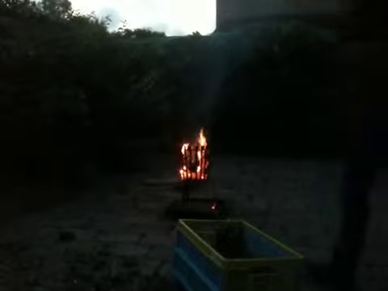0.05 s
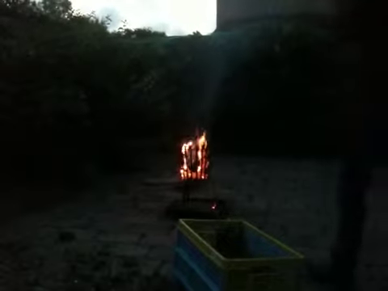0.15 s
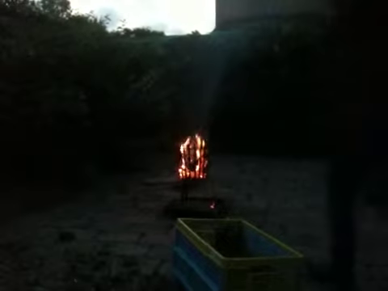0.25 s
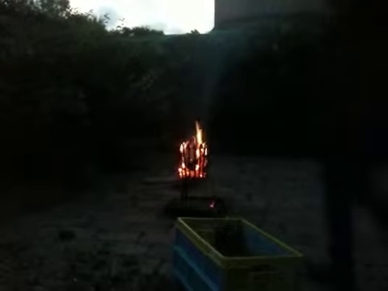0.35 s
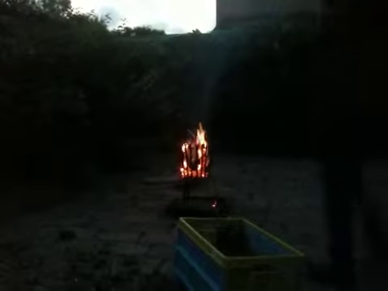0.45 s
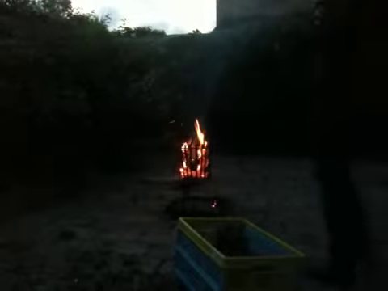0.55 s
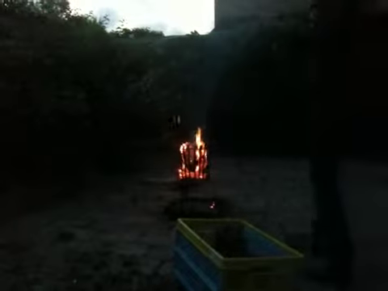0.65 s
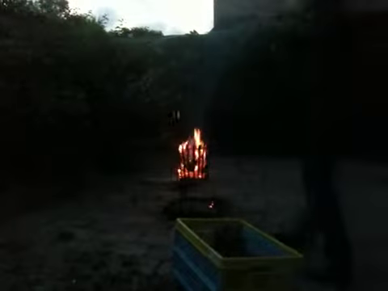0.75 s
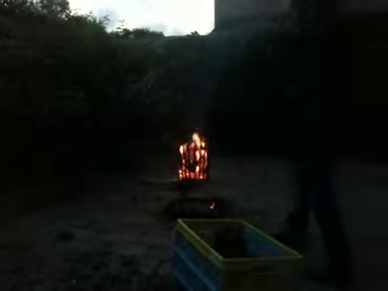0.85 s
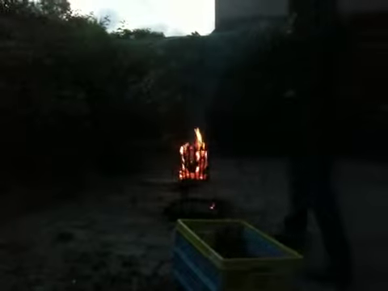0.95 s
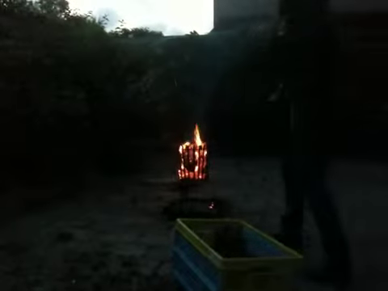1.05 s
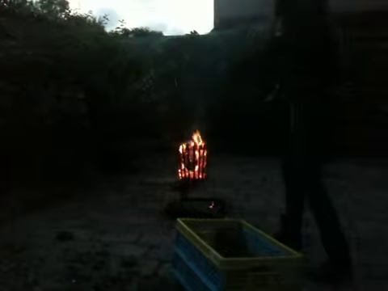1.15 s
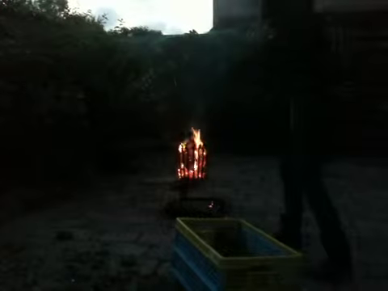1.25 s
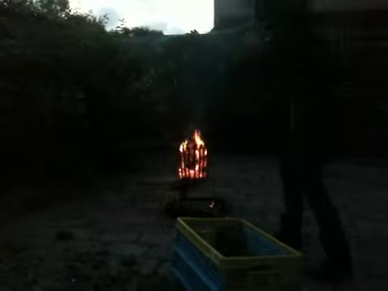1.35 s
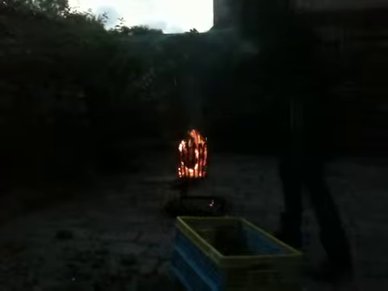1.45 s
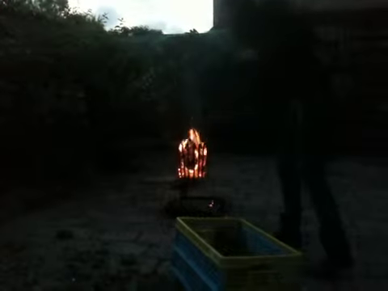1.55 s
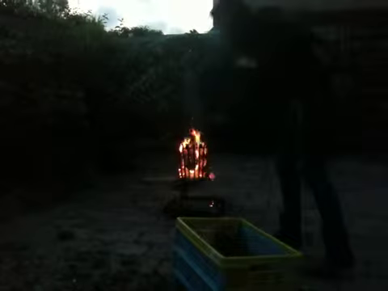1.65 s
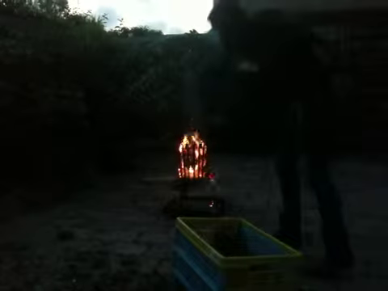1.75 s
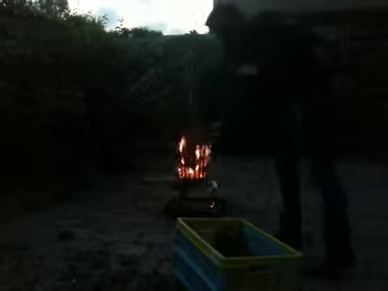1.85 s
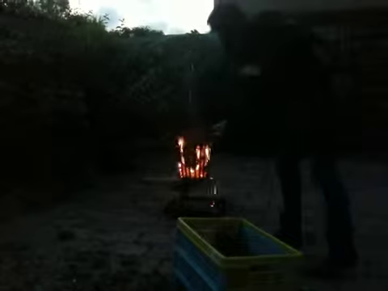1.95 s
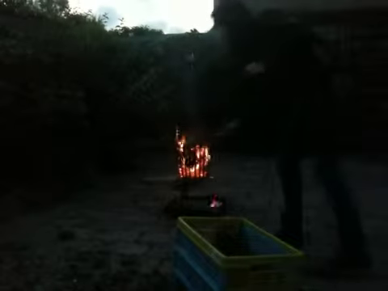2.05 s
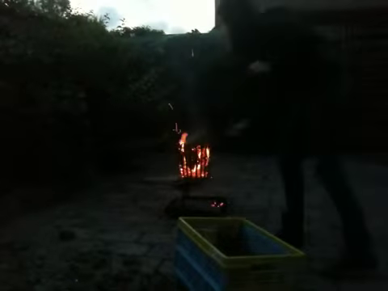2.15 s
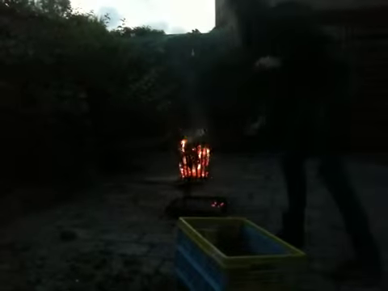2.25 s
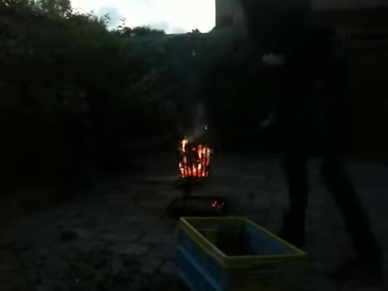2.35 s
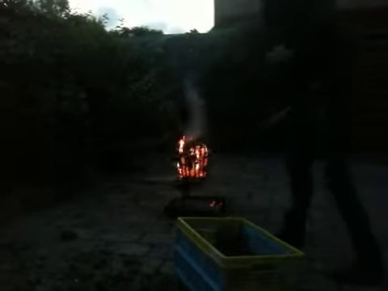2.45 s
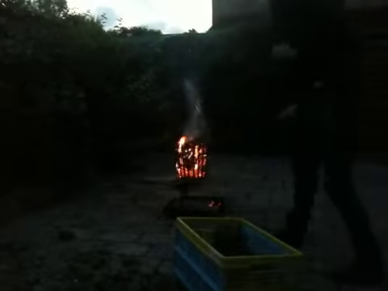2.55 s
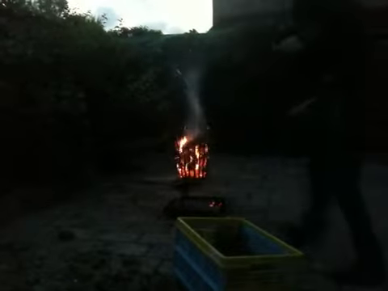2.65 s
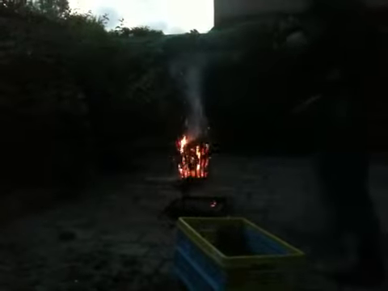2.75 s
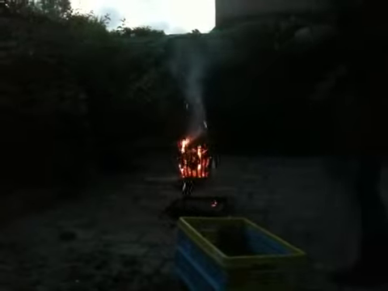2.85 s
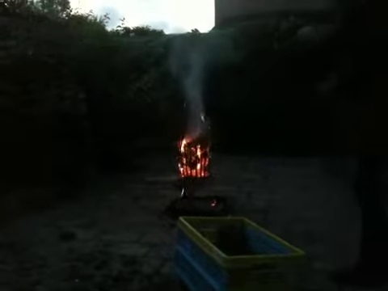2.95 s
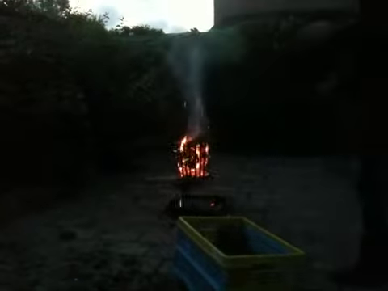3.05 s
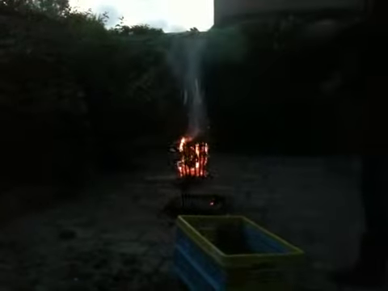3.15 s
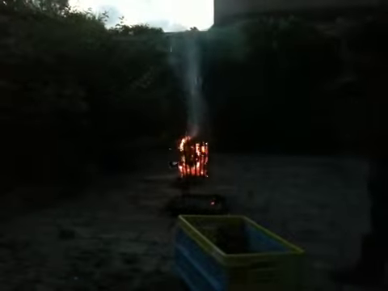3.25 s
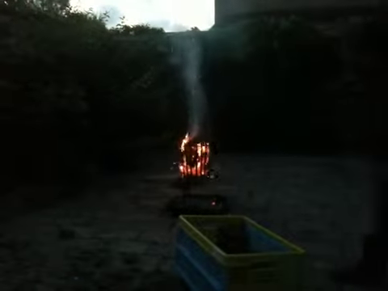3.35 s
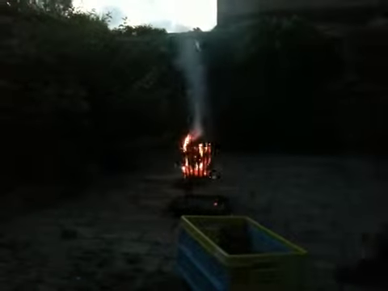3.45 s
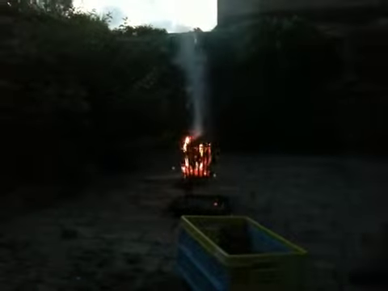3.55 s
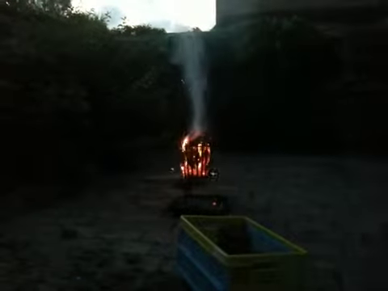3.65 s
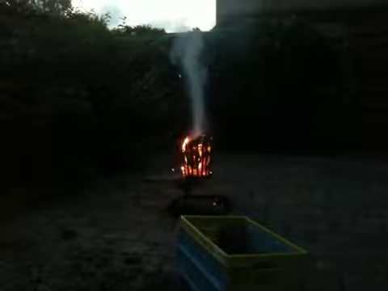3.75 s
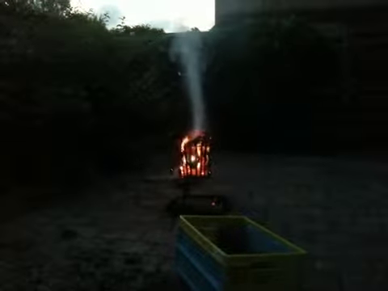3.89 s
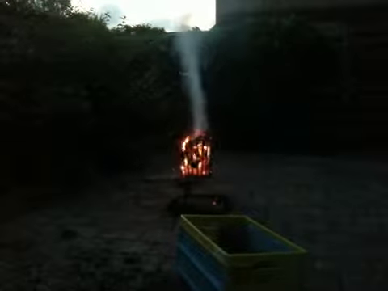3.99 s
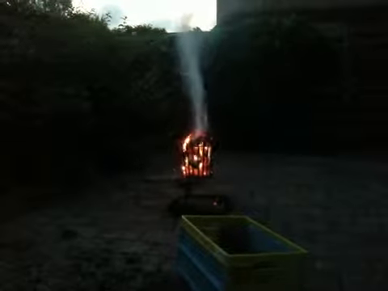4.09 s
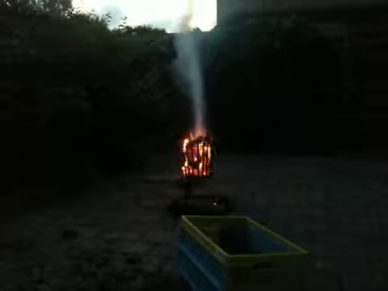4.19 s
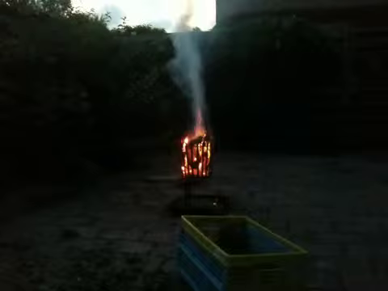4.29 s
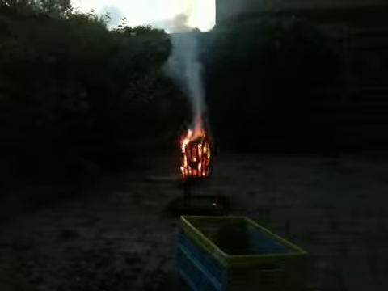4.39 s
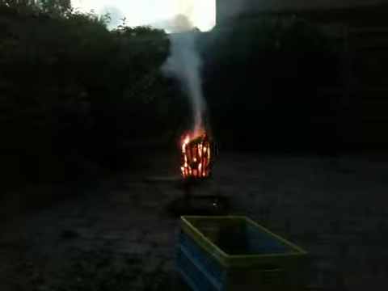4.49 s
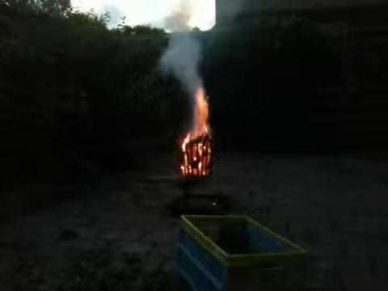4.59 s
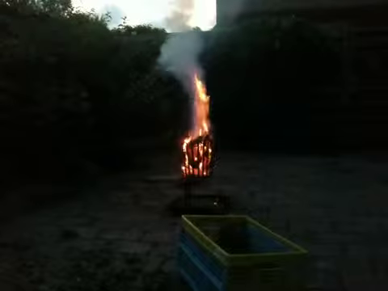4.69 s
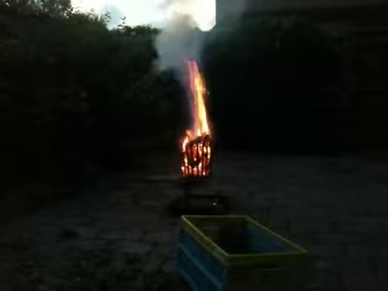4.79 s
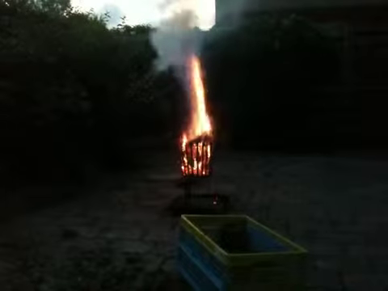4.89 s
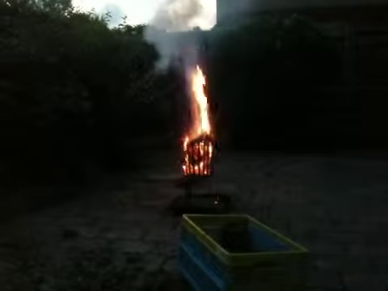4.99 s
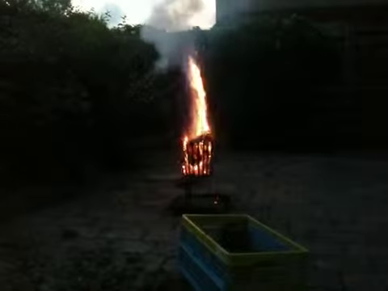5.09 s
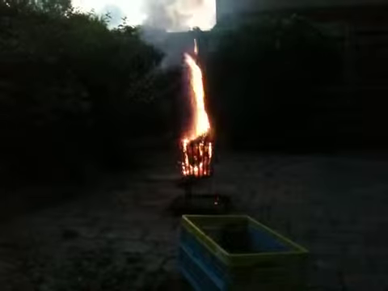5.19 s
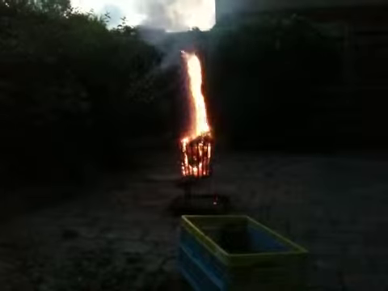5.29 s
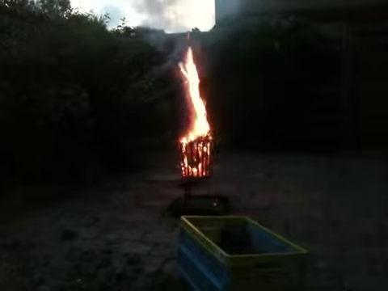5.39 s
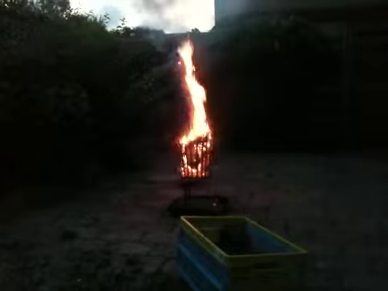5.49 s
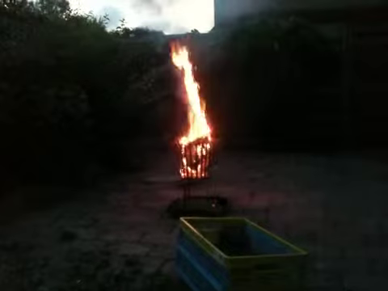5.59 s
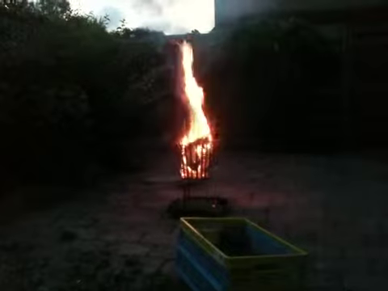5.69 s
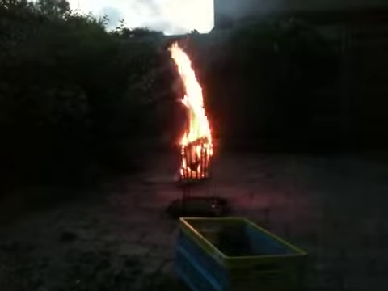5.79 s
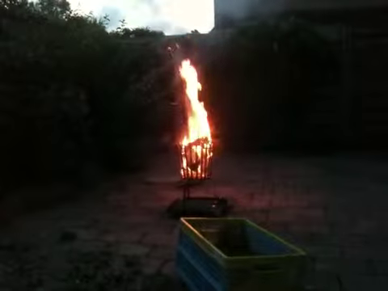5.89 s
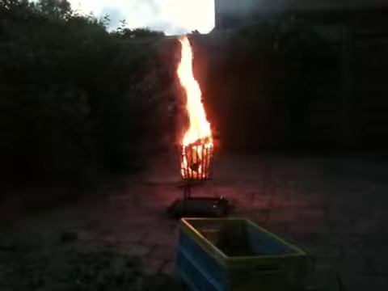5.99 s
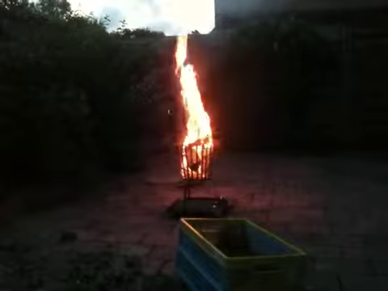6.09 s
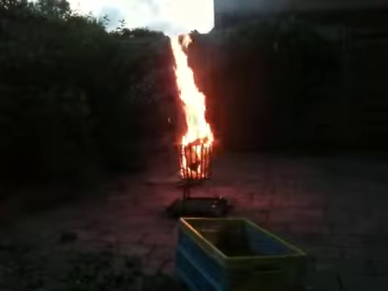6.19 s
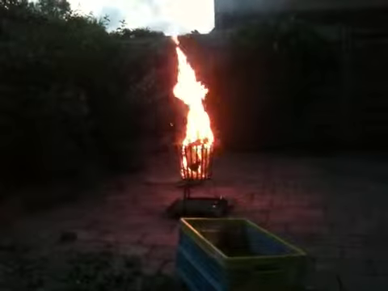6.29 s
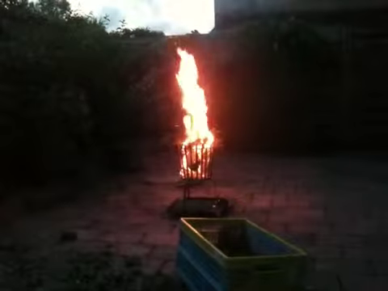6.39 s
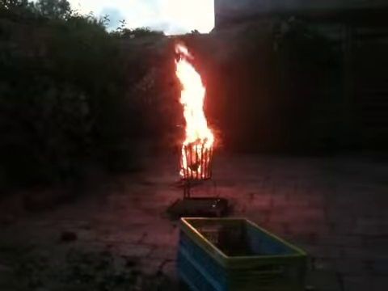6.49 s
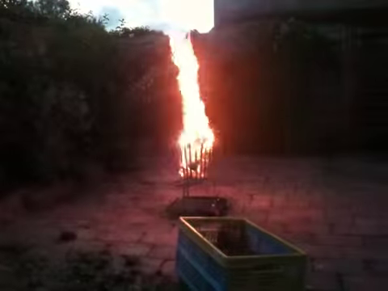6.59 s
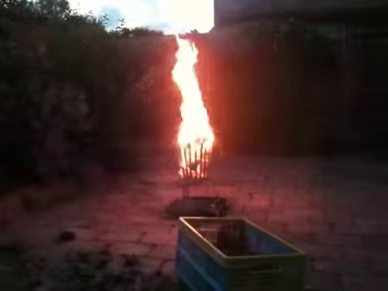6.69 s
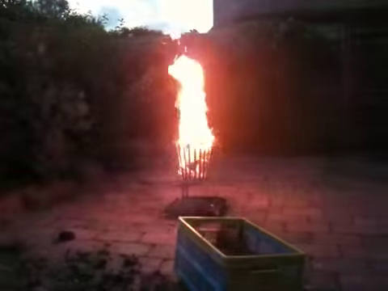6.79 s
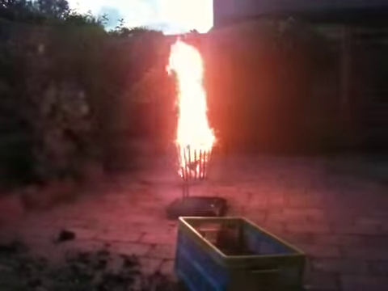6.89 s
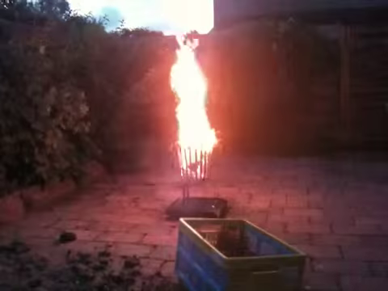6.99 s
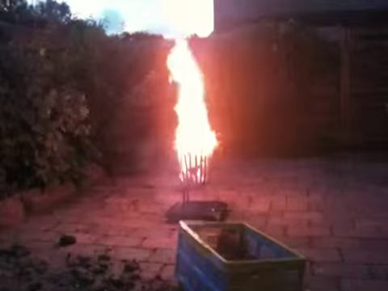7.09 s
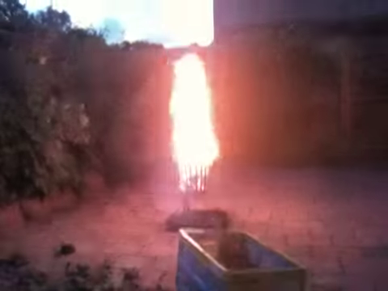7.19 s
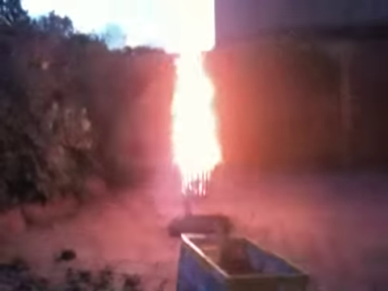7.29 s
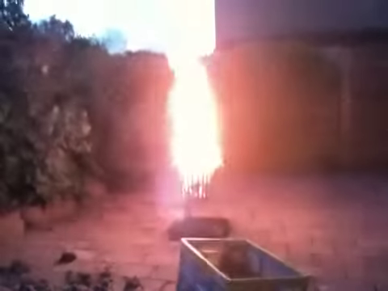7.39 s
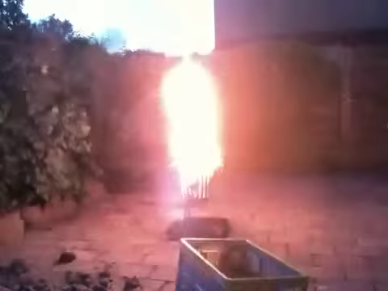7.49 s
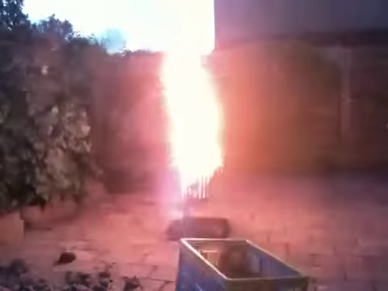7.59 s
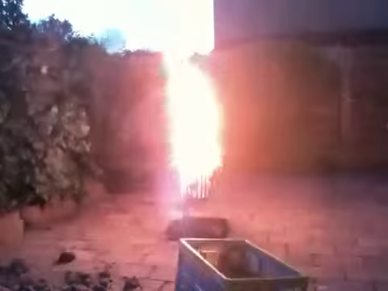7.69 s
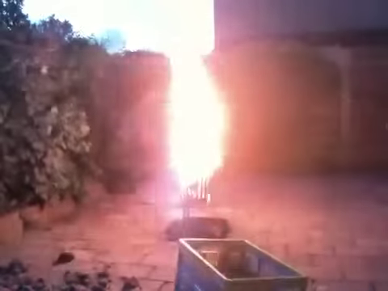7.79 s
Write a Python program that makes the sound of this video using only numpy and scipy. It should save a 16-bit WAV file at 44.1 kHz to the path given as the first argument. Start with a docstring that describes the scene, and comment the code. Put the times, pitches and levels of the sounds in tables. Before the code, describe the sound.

Twigs tick, cloth swishes and thin metal clangs in a quiet yard, then a dry shrub catches and builds into a dense, hissing crackle.

```python
"""A dry heather shrub burns on a fire basket in a paved yard: countless stem bursts thicken into a hissing crackle.
Before it flares, twigs tick and cloth swishes as it is carried over; feet knock and thin metal clangs.
Crackle and twigs are random clicks and bursts with short echoes; knocks and clang are dying tones with noise.
Far off, a vehicle's wavering firing tone climbs, drops at a gear change and climbs again.
One small outdoor microphone hears it all, weak in the deep bass and cut steeply at the top."""
import sys
import numpy as np
from scipy import signal
from scipy.fft import rfft, irfft
from scipy.io import wavfile

SR = 44100
rng = np.random.default_rng(int(sys.argv[2]) if len(sys.argv) > 2 else 0)


def wav_out(sig):
    """Save sig, one row per channel (or a flat mono array), as 16-bit PCM at SR to the path in sys.argv[1]."""
    wavfile.write(sys.argv[1], SR, np.round(np.clip(np.atleast_2d(sig).T, -1, 1) * 32767).astype(np.int16))


N = 345744


def from_db(db):
    """Decibels to gain."""
    return 10 ** (np.asarray(db) / 20)


def rms_one(x):
    """Scale to unit rms."""
    return x / np.sqrt(np.mean(x ** 2) + 1e-20)


def in_time(rows):
    """Interpolate each column after the time column to one value per sample."""
    s, *columns = np.transpose(rows)
    return [np.interp(np.arange(N) / SR, s, c) for c in columns]


def drift(rate_hz):
    """Slow random wander of unit rms: noise through two equal low-pass poles, made at every 40th sample."""
    r = np.exp(-2 * np.pi * rate_hz * 40 / SR)
    raw = rng.standard_normal(N // 40 + 2002)
    slow = signal.lfilter([1], [1, -2 * r, r * r], raw)[2000:]   # drop the filter's start-up
    return np.interp(np.arange(N) / 40, np.arange(len(slow)), rms_one(slow))


def response(spectrum, bumps=(), size=4096):
    """Minimum-phase impulse response of unit energy with a given colour and extra resonances."""
    hz = np.maximum(np.fft.rfftfreq(size, 1 / SR), 1)
    points_hz, points_db = np.transpose(spectrum)
    db = np.interp(np.log(hz), np.log(points_hz), points_db)
    for centre, width, height in bumps:
        db = db + height / (1 + (2 * (hz - centre) / width) ** 2)
    # folding the cepstrum forward makes the response causal
    cepstrum = irfft(np.log(from_db(db)))
    cepstrum[1:size // 2] *= 2
    cepstrum[size // 2 + 1:] = 0
    h = irfft(np.exp(rfft(cepstrum)))
    return h / np.linalg.norm(h)


def through(x, h):
    """Pass a sound through an impulse response."""
    return signal.oaconvolve(x, h)[:N]


def noise(spectrum):
    """Coloured noise of about unit rms."""
    return through(rng.standard_normal(N), response(spectrum))


def dying(t, t60):
    """A decay that loses 60 dB in t60 seconds."""
    return np.exp(-np.log(1000) * t / t60)


def add(out, s, sound):
    """Mix a sound in from time s."""
    at = max(round(s * SR), 0)
    out[at:at + len(sound)] += sound[:N - at]


def humps(rows):
    """Sum of smooth bell-shaped rises, one per row."""
    t = np.arange(N) / SR
    return sum(height * np.exp(-((t - s) / half) ** 2) for s, half, height in rows)


def strokes(rows, attack_s):
    """Gain of events that rise, hold and die away; their powers add."""
    power, t = np.zeros(N), np.arange(SR) / SR
    for s, hold, db, t60 in rows:
        rise = np.minimum(t / attack_s, 1)
        fall = dying(np.maximum(t - hold, 0), t60)
        add(power, s, (from_db(db) * rise * fall) ** 2)
    return np.sqrt(power)


def bursts(per_s, spread_db, largest):
    """Random clicks of varied size (largest counted in spreads), with unit mean power at any rate."""
    sizes = from_db(spread_db * np.minimum(rng.standard_normal(N), largest))
    born = rng.random(N) < per_s / SR
    return born * rms_one(sizes) * rng.choice([-1, 1], N) * np.sqrt(SR / per_s)


def stems(clicks, low_hz, high_hz, q, count=12):
    """Deal each click to a stem of its own pitch, a damped resonance of quality q."""
    dealt, out = rng.integers(0, count, N), np.zeros(N)
    for k, hz in enumerate(np.linspace(low_hz, min(high_hz, SR * .4), count)):
        r = np.exp(-np.pi * hz / q / SR)
        b = np.sqrt((1 - r * r) / 2) * np.array([1, 0, -1])
        a = [1, -2 * r * np.cos(2 * np.pi * hz / SR), r * r]
        out += signal.lfilter(b, a, clicks * (dealt == k) + 1e-18)
    return out


def cracks(events, t60, splinter, share=0.052):
    """Single breaks: a sharp spike, then a dying spray of sparse splinters."""
    out, t = np.zeros(N), np.arange(SR // 15) / SR
    for s, db in events:
        sparse = rng.standard_normal(len(t)) * (rng.random(len(t)) < share)
        crack = splinter * sparse * dying(t, t60)
        crack[0] = 1
        add(out, s + .001, from_db(db) * crack)
    return out


# one echo off the paving: delay and strength; decay of the tail from walls and hedges
GROUND_ECHO_S, GROUND_SHARE, YARD_T60_S = .00149, .29, 0.29


def yard(x, walls_db, echo_s=GROUND_ECHO_S):
    """The paving sends one quick echo, nearby things scatter briefly, walls and hedges add a short tail."""
    t = np.arange(SR // 4) / SR
    after_gap = t > echo_s / 2
    near = rng.standard_normal(len(t)) * dying(t, 0.032) * after_gap
    far = rng.standard_normal(len(t)) * dying(t, YARD_T60_S) * after_gap
    h = from_db(-7.0) * near / np.linalg.norm(near) + from_db(walls_db) * far / np.linalg.norm(far)
    h[0] = 1   # the direct sound
    h[round(echo_s * SR)] += GROUND_SHARE
    return through(x, h / np.linalg.norm(h))


def off_ground(x, walls_db, count=16):
    """Bursts at different heights have their own echoes; the ground echoes nearly agree and comb the mid treble."""
    height = rng.integers(0, count, N // 64 + 1).repeat(64)[:N]   # a new height every 64 samples
    lags = GROUND_ECHO_S * np.linspace(.972, 1.028, count)
    return sum(yard(x * (height == k), walls_db, lag) for k, lag in enumerate(lags))


# colour of the open air around the microphone: pitch_hz, relative_db (per Hz)
AIR_COLOUR = [(18, -48), (30, -22), (64, -26), (111, -1), (198, -10.5), (413, -6), (860, -10.5),
              (1240, -26), (1530, -12), (3030, -17), (7200, -17), (8640, -19.5), (14600, -19.5),
              (15800, -18.5)]


def open_air():
    """Still outdoor air: steady coloured noise."""
    return from_db(-70) * noise(AIR_COLOUR)


# colour of the low rush: pitch_hz, relative_db (per Hz)
RUSH_COLOUR = [(30, -24), (75, -34), (110, -10), (150, 2), (220, 1), (330, -1.5), (450, -15.5), (900, -8),
               (1600, -20), (4000, -58.5)]
RUSH_DB, RUSH_GROWTH_DB = -70, 5.0       # mean level before the flare; rise as the flame climbs
FLAME_UP_S, FLAME_FULL_S = 4.3, 7.1      # flame breaks through the shrub; stands at full height


def rush():
    """A fluttering low rush of air and flame, noise that grows as the flame climbs."""
    height = np.clip((np.arange(N) / SR - FLAME_UP_S) / (FLAME_FULL_S - FLAME_UP_S), 0, 1)
    level_db = RUSH_DB + RUSH_GROWTH_DB * height + 1.9 * drift(22)
    return from_db(level_db) * noise(RUSH_COLOUR)


# far engine, pulling through two gears: time_s, pitch_hz (mean firing rate), level_db (before swells and waver)
ENGINE = [(0, 110, -84), (.5, 132, -71), (1.85, 201, -73), (2.15, 208, -79), (2.65, 141, -85),
          (3.0, 135, -74.5), (3.5, 140, -75.5), (5.7, 185, -77.5), (7.8, 203, -86)]
# its hum swells now and then: centre_s, half_length_s, gain_db
ENGINE_SWELLS = [(.5, .06, 3.5), (1.85, .08, 6), (2.95, 0.091, 10.5), (3.27, 0.11, 14), (3.8, 0.062, 10.5)]
ENGINE_WAVER_DB = 2.0   # rms swing of the level on its way through the air


def far_engine():
    """Only the firing tone and a weak octave carry this far, wavering on the way."""
    hz, level_db = in_time(ENGINE)
    wavering_hz = hz * (1 + 0.0098 * drift(12.0))
    phase = 2 * np.pi * np.cumsum(wavering_hz) / SR
    gain = from_db(level_db + humps(ENGINE_SWELLS) + ENGINE_WAVER_DB * drift(4.0))
    return np.sqrt(2) * gain * (np.sin(phase) + from_db(-16) * np.sin(2 * phase))


GRAIN_SPREAD_DB, GRAIN_LARGEST = 4.5, 1.5   # grain sizes of twigs and cloth; largest in spreads
STROKE_ATTACK_S = 0.0018                    # rise time of a brush or a swish

# twigs brushing as the shrub is carried: start_s, hold_s, level_db, t60_s
TWIG_BRUSHES = [(1.13, 0.0065, -66, 0.047), (1.157, .015, -61, .35), (1.29, 0.037, -62.5, 0.29),
                (1.46, .01, -65, 0.27), (1.52, 0.47, -73.5, .3), (1.955, .04, -63.5, 0.4)]
# twigs catching: start_s, relative_db (spike, before the boost and colour below)
TWIG_CATCHES = [(0.0437, -46.5), (0.145, -50), (0.271, -48), (1.0465, -50), (1.0804, -44), (1.1308, -38),
                (1.1568, -33.5), (1.1792, -36), (1.222, -42), (1.294, -48), (1.4601, -57), (1.5124, -50),
                (1.7935, -48), (1.875, -47), (1.96, -46)]
# colour of dry twigs: pitch_hz, relative_db (per Hz)
TWIG_COLOUR = [(800, -11), (2000, -17.5), (4000, -7.5), (7000, -3), (11000, -5), (16000, -11)]


def twigs():
    """Dry twigs tick against each other in brushes of small clicks, and catch with sharp cracks."""
    ticks = bursts(500, GRAIN_SPREAD_DB, GRAIN_LARGEST) * strokes(TWIG_BRUSHES, STROKE_ATTACK_S)
    catches = from_db(5.5) * cracks(TWIG_CATCHES, t60=0.043, splinter=0.23)
    return through(ticks + catches, response(TWIG_COLOUR))


# a scuff and the swish of clothing: start_s, hold_s, level_db (mean), t60_s
CLOTH_SWISHES = [(.267, 0.0037, -54.5, .05), (.3, .03, -74, 0.27), (1.01, 0.27, -66.5, .25),
                 (1.66, .015, -68, 0.13)]
# colour of cloth: pitch_hz, relative_db (per Hz)
CLOTH_COLOUR = [(2000, -9), (4300, -14), (5500, -2), (6500, -1), (7800, -14), (10000, -24), (16000, -44)]


def cloth():
    """Clothing scuffs and swishes: dense coloured grains under fluttering strokes."""
    grains = through(bursts(900, GRAIN_SPREAD_DB, GRAIN_LARGEST), response(CLOTH_COLOUR))
    return grains * strokes(CLOTH_SWISHES, STROKE_ATTACK_S) * from_db(2.9 * drift(40))


def carrying():
    """Twigs and cloth share the echoes of the paved yard."""
    return off_ground(twigs() + cloth(), walls_db=-5.0, count=5)


# footfalls and knocks: start_s, thump_db, pitch_hz, t60_s (of the thump), scrape_db
STEPS = [(.413, -41, 282, 0.018, -61.5), (.917, -40.5, 368, 0.025, -61), (2.37, -55, 200, 0.08, -65),
         (3.166, -48, 267, 0.07, -53), (3.189, -51, 340, 0.037, -53), (3.235, -63, 248, 0.24, -64.5),
         (3.519, -61, 249, 0.061, -62), (4.14, -51.5, 241, 0.079, -60), (4.79, -70, 300, .15, -61.5),
         (4.83, -67, 396, 0.073, -58), (5.971, -51, 262, 0.044, -63), (7.335, -43.5, 320, 0.027, -63)]
# colour of grit under a sole: pitch_hz, relative_db (per Hz)
SOLE_COLOUR = [(30, 1), (80, -14), (200, -3), (500, -6.5), (950, -7), (1500, -13.5), (3000, -15),
               (8000, -37)]


def steps():
    """Each footfall or knock is a damped thump with a longer scrape of grit."""
    out, t = np.zeros(N), np.arange(SR // 4) / SR
    sole = response(SOLE_COLOUR)
    for s, thump_db, hz, t60, scrape_db in STEPS:
        grit = through(rng.standard_normal(len(t)) * dying(t, 2.8 * t60), sole)[:len(t)]
        thump = np.sin(2 * np.pi * hz * t) * dying(t, t60) * (1 - np.exp(-2 * t * hz))
        add(out, s, from_db(thump_db) * thump + from_db(scrape_db) * grit)
    return out


# close modes of the thin metal: pitch_hz, relative_db
METAL_MODES = [(783, -11), (838, -2), (1281, -1), (1330, -8), (1368, -12), (1464, -1), (1493, -4),
               (1524, -6), (1948, -7), (1977, -2), (2038, -5), (2080, 4), (2139, -8), (2185, -11),
               (2368, -10), (2427, -9), (2463, -9), (2563, -8), (3870, 0), (3915, -8)]
# colour of its dense rattle: pitch_hz, relative_db (per Hz)
RATTLE_COLOUR = [(400, -33), (620, -23), (820, -7), (1080, -20), (1350, -5), (1800, -14.5), (2060, -0.5),
                 (2280, -7.5), (2500, -7), (2900, -16), (3900, -9), (4400, -20), (7500, -33), (12000, -50)]
CLANG_S = .632     # moment of the blow
RING_DB = -58.0    # level of the clear modes


def clang():
    """A dull blow sets thin metal ringing in clusters of close modes; the high ones die first."""
    out, t = np.zeros(N), np.arange(SR) / SR
    modes = np.zeros(SR)
    for hz, db in METAL_MODES:
        tone = np.sin(2 * np.pi * hz * t + rng.uniform(0, 2 * np.pi))
        modes += from_db(db) * tone * dying(t, 0.59 * (2000 / hz) ** 0.38)
    rattle = noise(RATTLE_COLOUR)[:SR]
    low = signal.sosfiltfilt(signal.butter(2, 3000, fs=SR, output="sos"), rattle)
    rattle = low * dying(t, 0.73) + (rattle - low) * dying(t, 0.49)
    spreading = 1 - np.exp(-t / 0.0046)   # the ring takes a moment to spread
    ringing = (from_db(RING_DB) * modes + from_db(-46.5) * rattle) * spreading
    blow_colour = [(60, -51), (130, -8), (300, 9.5), (1400, 7), (2500, -26), (8000, -15), (16000, -46)]
    blow = noise(blow_colour)[:SR] * dying(t, 0.039)
    thud = np.sin(2 * np.pi * 230 * t) * dying(t, 0.032)
    add(out, CLANG_S - .005, ringing)
    add(out, CLANG_S, from_db(-42.0) * blow + from_db(-43.5) * thud)
    return out


# a sprig flares up: centre_s, half_length_s, gain_db
FLARES = [(2.66, 0.03, 3), (3.6, 0.05, 1), (5.21, 0.027, 1), (5.465, 0.02, 3.5), (5.82, 0.043, 1)]
# the crackle falters for a moment: centre_s, half_length_s, depth_db
LULLS = [(2.312, .016, 13), (2.555, .012, 7), (2.74, .016, 4), (3.138, .018, 6), (4.738, .025, 6),
         (5.35, .05, 2), (5.93, .035, 4)]


def surges():
    """Brief rises and dips of the burning, in dB."""
    return humps(FLARES) - humps(LULLS)


# how fiercely the shrub burns: time_s, level_db (crackle, before surges and flurries)
BLAZE = [(2.07, -61), (2.16, -59), (2.22, -50), (2.66, -48), (2.87, -51), (3.15, -49.5), (3.6, -45),
         (3.88, -43.5), (4.6, -46), (5.8, -45), (6.15, -42), (7.7, -41.5), (7.84, -46.5)]
# the loudest single snaps: start_s, relative_db (spike, before SNAP_DB and colour)
SNAPS = [(2.0747, -33.5), (2.1166, -34.5), (2.1234, -36), (2.147, -37), (2.1645, -31), (2.1794, -31),
         (2.1884, -30), (2.2697, -31), (2.2834, -29), (2.3271, -21.5), (2.3384, -30), (2.3989, -26),
         (2.4074, -30), (2.4409, -29), (2.4768, -23), (2.5696, -26.5), (2.5774, -28), (2.597, -24),
         (2.6628, -28), (2.6808, -26), (2.6884, -27), (2.7796, -26), (2.8024, -32), (2.8769, -27),
         (2.9332, -26.5), (2.9796, -27.5), (3.046, -30), (3.1113, -28), (3.2624, -26), (3.5643, -24),
         (4.2358, -23), (4.6024, -27), (5.1277, -25), (5.2194, -25), (5.2694, -26), (5.4385, -23),
         (5.7523, -26), (6.3485, -23), (6.5954, -24), (6.6334, -24), (6.6603, -20), (6.6974, -24),
         (6.8109, -24)]
FLURRY_DB, FLURRY_T60_S = -20.5, .06   # flurry set off by each snap: level relative to its table entry, decay


def burning(surge_db):
    """Gain of the crackle: the blaze with its surges, plus a short flurry after every snap."""
    blaze_db, = in_time(BLAZE)
    flurries = [(s, 0, db + FLURRY_DB, FLURRY_T60_S) for s, db in SNAPS]
    return np.hypot(from_db(blaze_db + surge_db), strokes(flurries, attack_s=.001))


# colour of the crackle: pitch_hz, relative_db (per Hz)
CRACKLE_COLOUR = [(300, -26), (650, -36), (930, -10), (1200, -24.5), (1900, -21), (2430, -8.5), (2950, -17),
                  (3300, -7), (4000, -4), (6000, -1.5), (8000, -1.5), (9500, -6), (11000, -2.5),
                  (15500, -1)]
# peaks and dips in the colour of the fire: basket resonances at 2400 and 8100 Hz, with a slight ripple between
# 4.3 and 5.1 kHz: pitch_hz, width_hz, added_db
FIRE_BUMPS = [(2400, 200, 2.0), (4350, 160, -2.0), (4680, 200, 1.0), (5050, 200, -2.5), (8100, 300, 2.5)]
FULL_BLAZE_DB = -42.0                     # crackle level at which the two rates below hold
FINE_PER_S, POPS_PER_S = 12500, 700       # fine bursts and sharp pops
RATE_FOLLOWS = 1.3                        # exponent: how steeply the rates follow the crackle gain
POP_DB, RINGING_POP_DB = -10.5, -4.5      # dry and briefly ringing pops, relative to the crackle
SNAP_DB = 7.0                             # boost of the single snaps at the source


def crackle(vigour, pace, lit):
    """Sap and gas burst the fine stems in flurries; bigger bursts pop sharply and escaping gas hisses."""
    flutter = from_db(0.72 * drift(34))
    fine = bursts(FINE_PER_S * pace, spread_db=8.5, largest=1.32)
    sizzle = from_db(-2.0) * stems(fine, low_hz=3400, high_hz=16000, q=1.5)
    dry_pops = bursts(POPS_PER_S * pace, spread_db=5.0, largest=1.5)
    ringing_pops = stems(dry_pops, low_hz=8500, high_hz=14900, q=1.43)
    pops = from_db(POP_DB) * dry_pops + from_db(RINGING_POP_DB) * ringing_pops
    hiss = from_db(-16.5) * rng.standard_normal(N)   # escaping gas
    snaps = from_db(SNAP_DB) * cracks(SNAPS, t60=0.036, splinter=0.067)
    steady = (flutter * (sizzle + pops) + hiss) * vigour * lit
    return through(steady + snaps, response(CRACKLE_COLOUR, FIRE_BUMPS))


# thicker stems popping: time_s, relative_db (before the trim and surges below)
THICK = [(2.08, -74), (2.3, -65.5), (2.65, -65.5), (2.9, -70.5), (3.4, -65), (4.7, -67.5), (5.3, -68),
         (6.1, -64), (7.84, -65)]
THICK_FOLLOWS = 0.75   # share of the flares and lulls, in dB, that they follow


def thick_stems(surge_db, pace, lit):
    """Thicker stems burst less often and ring lower and longer."""
    thick_db, = in_time(THICK)
    clicks = bursts(FINE_PER_S * pace / 6, spread_db=1.0, largest=1.1)
    ringing = stems(clicks, low_hz=904, high_hz=2636, q=7.3)
    return ringing * lit * from_db(thick_db - 1.5 + THICK_FOLLOWS * surge_db)


def fire():
    """Fine and thick stems burst faster as the fire burns harder, echoing off the paving."""
    surge_db = surges()
    vigour = burning(surge_db)
    pace = (vigour / from_db(FULL_BLAZE_DB)) ** RATE_FOLLOWS
    lit = np.arange(N) / SR > SNAPS[0][0]   # the first snap sets the shrub off
    stem_bursts = crackle(vigour, pace, lit) + thick_stems(surge_db, pace, lit)
    return off_ground(stem_bursts, walls_db=-4.5)


def scene():
    """Everything in and beyond the yard, heard from one spot."""
    return (open_air() + rush() + far_engine() + carrying() + steps() + clang() + fire())[None]


def record(dry):
    """The small microphone loses the deep bass; the top is cut steeply at 15.85 kHz."""
    thin = signal.sosfilt(signal.butter(2, 50, "high", fs=SR, output="sos"), dry)
    top_cut = signal.firwin(255, 15850, window="blackman", fs=SR)
    return signal.oaconvolve(thin, top_cut[None], mode="same")


dry = scene()
out = record(dry)
wav_out(out)
```